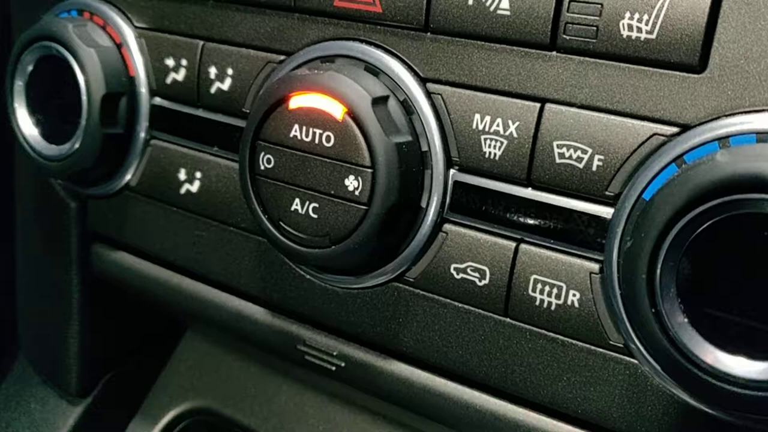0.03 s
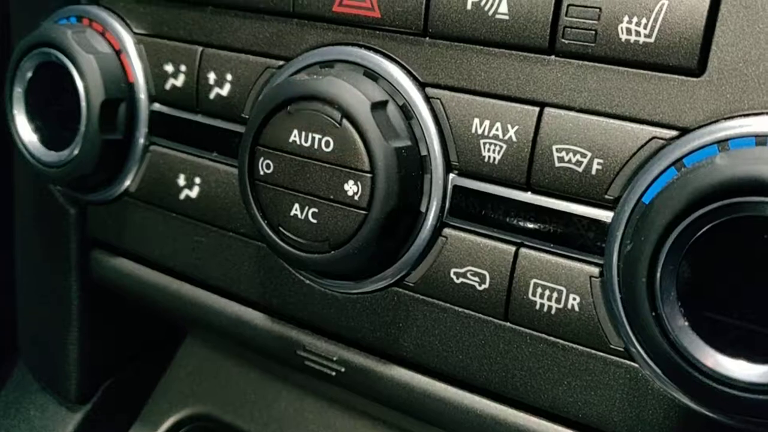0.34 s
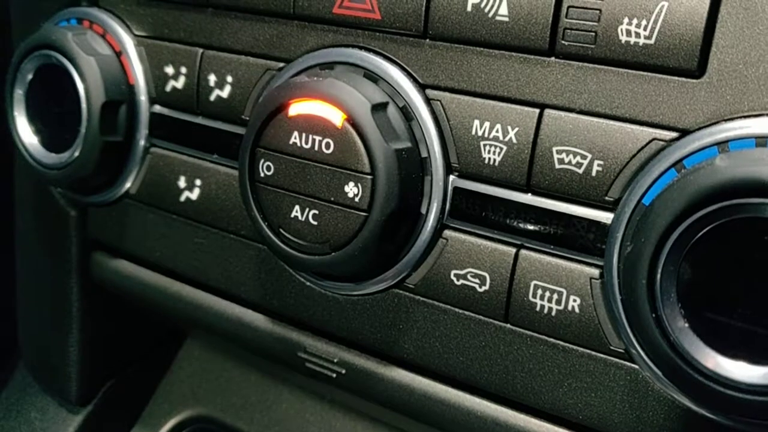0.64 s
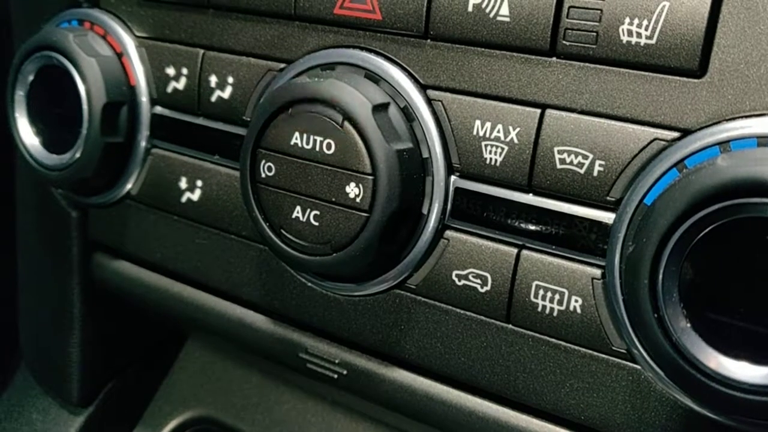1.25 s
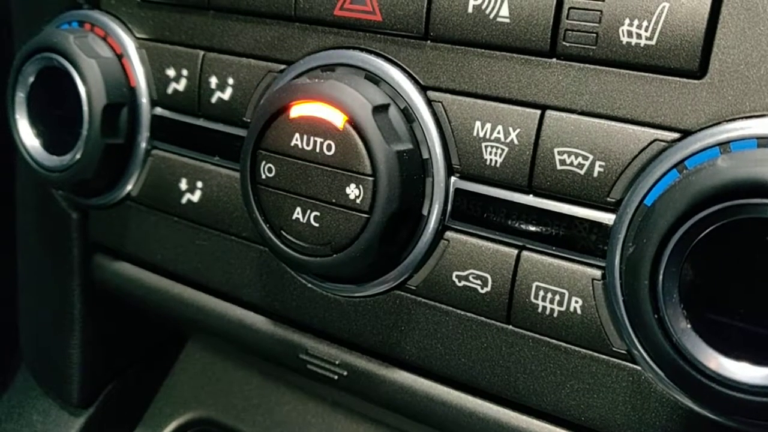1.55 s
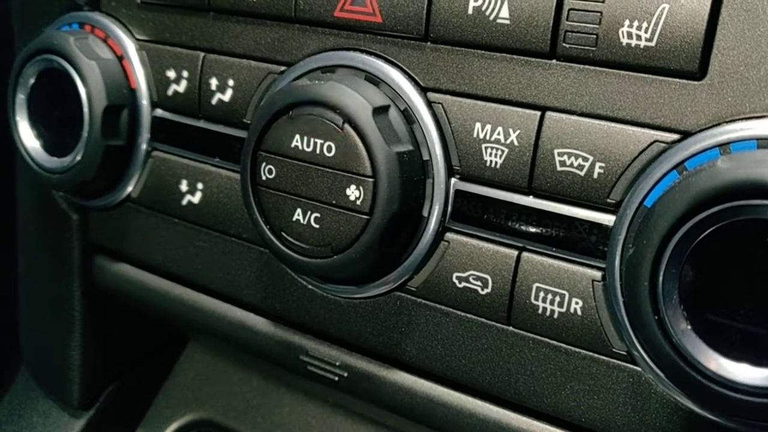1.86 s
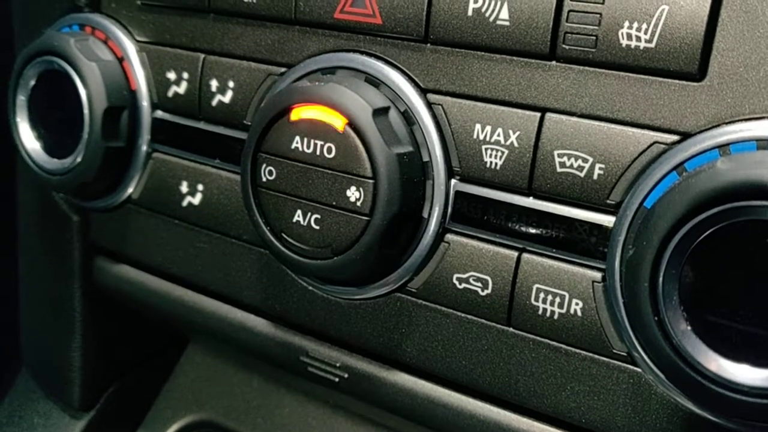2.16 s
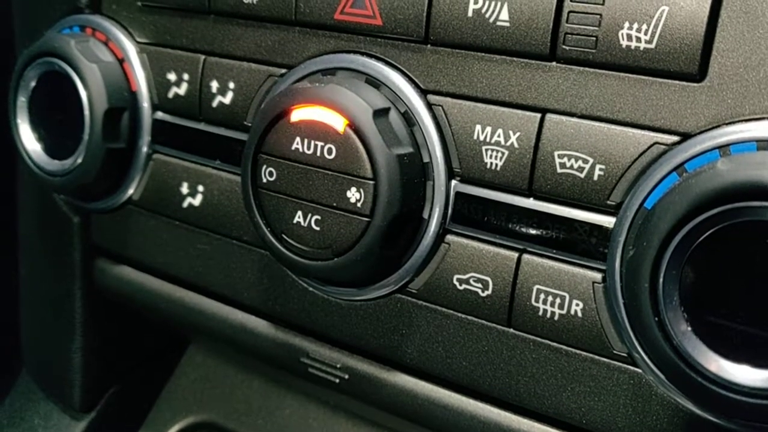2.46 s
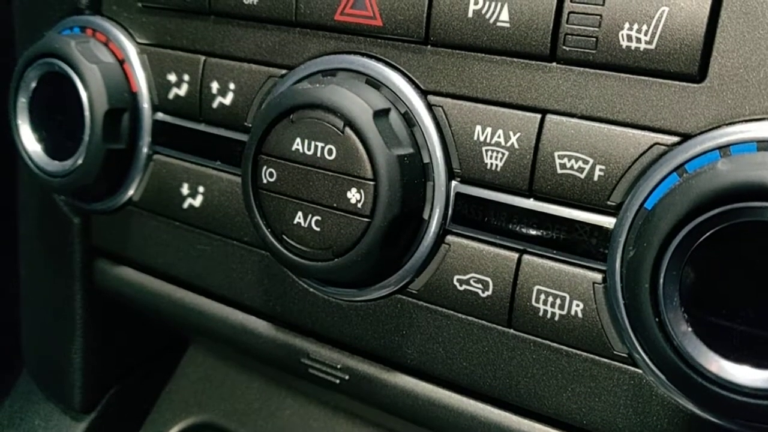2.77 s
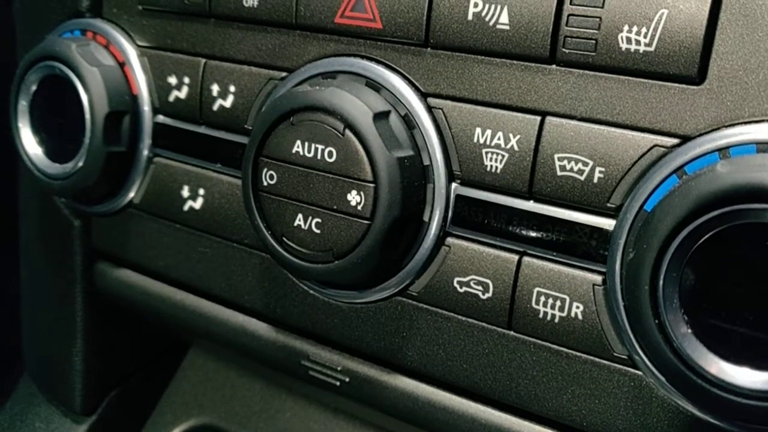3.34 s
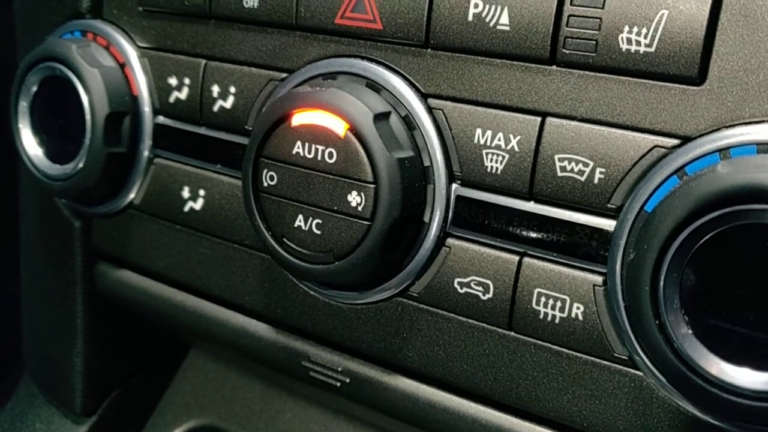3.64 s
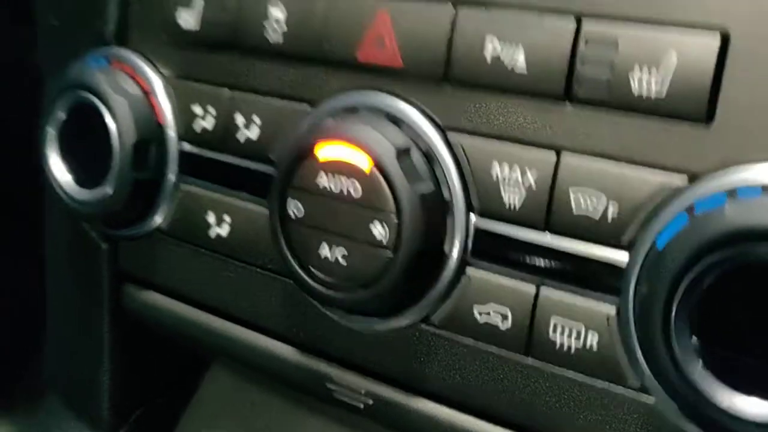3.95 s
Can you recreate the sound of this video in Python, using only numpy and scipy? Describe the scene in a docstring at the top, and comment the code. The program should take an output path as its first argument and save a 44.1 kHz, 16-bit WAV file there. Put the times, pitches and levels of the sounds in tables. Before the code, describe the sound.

A car heater blower runs steadily, heard close to the dashboard of a parked car. Rushing air fades in with a fan hum, then a low rumble swells unevenly beneath it while the vents whistle faintly.

```python
"""Car heater blower

A parked car's blower runs steadily, heard close to the dashboard. Turbulent air rushes
through ducts that ring faintly and whistles over vent slats; the fan hums, its motor whines.
The closed cabin booms in slow, uneven swells. The sound fades in, the bass after the rush;
at the very end a short hiss swells on the right."""
import sys
import numpy as np
from scipy import signal
from scipy.fft import rfft, irfft
from scipy.io import wavfile

SR = 44100
rng = np.random.default_rng(int(sys.argv[2]) if len(sys.argv) > 2 else 0)


def inscribe(sig):
    """Save sig as 16-bit PCM at rate SR to the path in sys.argv[1].

    A 1-D sig is mono; a 2-D sig holds one channel per row.
    Samples are clipped to [-1, 1] before scaling.
    """
    pcm = np.round(np.clip(np.atleast_2d(sig).T, -1, 1) * 32767)
    wavfile.write(sys.argv[1], SR, pcm.astype(np.int16))


N = 176400
TIME_S, FREQS_HZ = np.arange(N) / SR, np.fft.rfftfreq(N, 1 / SR)


def amp(db):
    """Decibels to gain."""
    return 10 ** (np.asarray(db) / 20)


def over_hz(points, column=1):
    """One table column, interpolated over log frequency."""
    table = np.transpose(points)
    return np.interp(np.log(FREQS_HZ + 1), np.log(table[0]), table[column])


def over_time(points):
    """Breakpoints, interpolated linearly in time."""
    return np.interp(TIME_S, *np.transpose(points))


def white():
    """White noise spectrum, unit power per Hz."""
    return rfft(rng.standard_normal(N)) * np.sqrt(SR / 2)


def drift(rate_hz):
    """Random drift of unit variance, rolling off at rate_hz."""
    slow = irfft(white() * np.exp(-(FREQS_HZ / rate_hz) ** 2) * (FREQS_HZ > 0), N)
    return slow / slow.std()


def wavering(hz, wander_hz, rate_hz):
    """Unit-power sine with wandering pitch."""
    cycles = np.cumsum(hz + wander_hz * drift(rate_hz)) / SR
    return np.sqrt(2) * np.sin(2 * np.pi * (cycles + rng.random()))


def stereo(spectrum, lead_rad):
    """Spectrum to a stereo signal, left phase ahead by lead_rad."""
    return irfft(np.array([spectrum, spectrum * np.exp(-1j * lead_rad)]), N)


def ringing(hz, width_hz, lead_rad):
    """Turbulence in one narrow resonance; stereo, unit power."""
    pair = stereo(white() / (1 + 1j * (FREQS_HZ - hz) / width_hz) ** 2, lead_rad)
    return pair / pair.std()


def ripple(depth_db=0.8, step_hz=39.9, above_hz=900):
    """Random fine peaks and dips that cabin reflections leave above the bass."""
    heights = rng.standard_normal(len(FREQS_HZ))
    comb = np.interp(FREQS_HZ / step_hz, np.arange(len(FREQS_HZ)), heights)
    return amp(depth_db * comb * FREQS_HZ / (FREQS_HZ + above_hz))


def bass_entry(mix, start_s=0.373, rise_s=0.042, below_hz=146, early_db=-6):
    """Holds the bass down until start_s, then lets it rise."""
    bass = irfft(rfft(mix) / (1 + (FREQS_HZ / below_hz) ** 6), N)
    held = np.clip(1 - (TIME_S - start_s) / rise_s, 0, 1)
    return mix + bass * (amp(early_db * held) - 1)


def hiss(start_s=3.882, rise_s=0.083, left_db=-11):
    """Bright hiss swelling close to the right ear."""
    # Each row: frequency in Hz, right-ear density in dB per Hz.
    spectrum = [(1500, -106), (4000, -95.3), (5700, -100.5), (6900, -91), (7900, -90.5), (9500, -101.5),
                (12500, -99), (15500, -92)]
    noise = irfft(np.array([white(), white()]) * amp(over_hz(spectrum)), N)
    swell = np.clip((TIME_S - start_s) / rise_s, 0, 1)
    return noise * swell * amp([[left_db], [0]])


def vent_whistle(hz=1478, lead_rad=-1.18, tone_share=0.27, gain_db=3):
    """Air whistles faintly over vent slats: a thin tone inside a breathy band."""
    # Each row: time in seconds, relative level in dB.
    levels = [(0.17, -84), (0.35, -71.5), (0.64, -75), (0.74, -70), (1.04, -65), (1.36, -72), (1.48, -64.5),
              (1.58, -71), (1.85, -63), (2.0, -73), (2.14, -65.5), (2.45, -66), (3.0, -70), (3.3, -69),
              (3.43, -62), (3.6, -68.5), (3.76, -66.5), (4.0, -73)]
    tone = stereo(rfft(wavering(hz, wander_hz=6.9, rate_hz=14)), lead_rad)
    breath = ringing(hz, width_hz=26, lead_rad=lead_rad)
    whistle = np.sqrt(tone_share) * tone + np.sqrt(1 - tone_share) * breath
    return whistle * amp(gain_db + over_time(levels))


def cabin(boom_gain_db=0.06, drone_gain_db=1.5):
    """The cabin's two lowest resonances swell and sink, alike at both ears; the lower one throbs."""
    # Each row of both: time in seconds, relative level in dB.
    boom_levels = [(0.36, -62), (0.39, -48), (0.48, -47), (0.52, -57), (0.56, -48), (0.6, -56), (0.64, -44),
                   (0.82, -54), (0.98, -38.5), (1.05, -54), (1.16, -39), (1.23, -50), (1.28, -43),
                   (1.44, -43.5), (1.47, -39), (1.84, -38.5), (1.87, -41.5), (2.26, -38.5), (2.44, -44),
                   (2.5, -36), (2.69, -56), (2.8, -41), (2.93, -41), (2.96, -51), (3.05, -40), (3.09, -46),
                   (3.25, -36.5), (3.34, -38), (3.38, -43), (3.46, -37), (3.59, -53.5), (3.67, -40),
                   (3.93, -41.5), (4.0, -55)]
    drone_levels = [(0.36, -69), (0.47, -51), (2.56, -52), (2.7, -36.5), (2.81, -61), (2.93, -42.5),
                    (3.24, -53.5), (3.27, -45), (3.72, -49.5), (3.77, -56), (3.86, -36.5), (4.0, -53)]
    throb = 1 + 0.22 * drift(rate_hz=22)
    boom = throb * wavering(hz=43.86, wander_hz=2.7, rate_hz=12.6)
    boom *= amp(boom_gain_db + over_time(boom_levels))
    drone = wavering(hz=74.04, wander_hz=4.4, rate_hz=14.6)
    drone *= amp(drone_gain_db + over_time(drone_levels))
    onset_s = boom_levels[0][0]
    return (boom + drone) * np.minimum(TIME_S / onset_s, 1) ** 3


def fan(wander_hz=1.47, rate_hz=12.5):
    """Fan hum and faint motor whine, slightly unsteady in pitch and level."""
    # Each row: frequency in Hz, left and right relative level in dB, unsteadiness from 0 to 1.
    tones = [(271.8, -46.5, -46.5, 0.26), (351.6, -56.5, -64, 0.4), (11569, -106, -93, .4)]
    hum = np.zeros((2, N))
    for hz, left_db, right_db, unsteadiness in tones:
        tone = wavering(hz, wander_hz, rate_hz) * (1 + unsteadiness * drift(rate_hz))
        hum += tone * amp([[left_db], [right_db]])
    return hum


def ducts():
    """Airflow rings narrow duct resonances; a hollow one swells and sinks."""
    # Each row: frequency and width in Hz, left and right relative level in dB, left lead in radians.
    modes = [(197.7, 14.7, -54.5, -56.5, -0.17), (304, 18.3, -54, -52.5, -0.06),
             (428.5, 14, -56, -55.5, -0.2), (699.3, 19, -67, -61.5, 0.5), (1270, 22, -76, -78, 1),
             (1390, 21, -69.5, -66, 1.5), (1614, 38, -84, -70.5, -1.5), (2018, 24, -77, -73, 1.1),
             (2970, 64, -78.5, -81, 1.3), (3337, 44, -80, -87, .3)]
    # Each row: time in seconds, relative level in dB.
    hollow_levels = [(0.6, -58), (0.74, -61), (0.78, -52), (0.81, -62), (1.03, -54), (1.05, -64),
                     (1.49, -55.5), (1.69, -63), (1.72, -57.5), (3.02, -58), (3.05, -54), (3.12, -61),
                     (3.16, -52), (3.25, -61), (3.33, -48), (3.39, -59), (3.54, -61), (3.56, -53.5),
                     (3.64, -61), (3.89, -55), (3.98, -60), (4.0, -53)]
    steady = sum(ringing(hz, width_hz, lead_rad) * amp([[left_db], [right_db]])
                 for hz, width_hz, left_db, right_db, lead_rad in modes)
    hollow = ringing(hz=806, width_hz=44, lead_rad=0.37)
    left_right_db = [[-4], [-0.5]]
    return steady + hollow * amp(over_time(hollow_levels) + left_right_db)


def air_rush(gain_db=0.16, flutter_db=0.5):
    """Turbulent rush from the vents, alike at both ears in the bass, diffuse in the treble."""
    # Each row: frequency in Hz, left and right relative density in dB, left-right correlation.
    spectrum = [(20, -75, -79, 1), (58, -69.5, -69.5, 0.98), (90.6, -62.5, -62, 0.89),
                (117, -61, -63.5, 0.85), (169, -69.5, -69, 0.65), (195, -64, -66, 1), (284, -68, -67, 0.95),
                (372, -70, -71, 0.42), (442, -70, -71, 0.89), (551, -75, -70, 0.72),
                (632, -78.5, -78, 0.35), (776, -79.5, -77.5, 0.68), (847, -82, -84, -0.09),
                (988, -79.5, -84.5, 0.16), (1196, -90, -86, -0.37), (1450, -86, -84, -0.27),
                (1787, -93.5, -89, -0.42), (2075, -91.5, -94, 0.28), (2480, -97.5, -97.5, -0.08),
                (3280, -99.9, -102.0, -0.27), (3800, -103.4, -105.2, 0.35), (5050, -108.6, -108.6, -0.11),
                (6100, -108.2, -108.8, -0.08), (6840, -106.4, -108.1, 0.067), (7650, -112.1, -106.8, -0.09),
                (9000, -111.8, -111.5, -0.13), (15500, -111.9, -111.9, -0.046)]
    common, independent = white(), white()
    correlation = over_hz(spectrum, column=3)
    blend = correlation * common + np.sqrt(1 - correlation ** 2) * independent
    left = common * amp(over_hz(spectrum, column=1)) * ripple()
    right = blend * amp(over_hz(spectrum, column=2)) * ripple()
    return irfft(np.array([left, right]), N) * amp(gain_db + flutter_db * drift(rate_hz=45))


def scene():
    """The blower fades in over the cabin boom; whistle and closing hiss on top."""
    # Each row: time in seconds, blower gain in dB.
    fade_in = [(.17, -17), (.24, -12.9), (.31, -8), (.43, -4), (.62, -2.5), (.8, -1.75), (1.1, -1.2),
               (1.3, -0.6), (1.7, 0), (2.3, 0.46)]
    blower = (air_rush() + ducts() + fan()) * amp(over_time(fade_in))
    return bass_entry(blower + cabin()) + vent_whistle() + hiss()


def record(dry):
    """Silence until the microphone opens; low-pass band limit."""
    open_s, rise_s, cutoff_hz = 0.163, 0.0014, 15800
    opened = dry * np.clip((TIME_S - open_s) / rise_s, 0, 1)
    lowpass = signal.firwin(511, cutoff_hz, window=("kaiser", 9), fs=SR)
    return signal.oaconvolve(opened, lowpass[None], "same")


dry = scene()
out = record(dry)
inscribe(out)
```